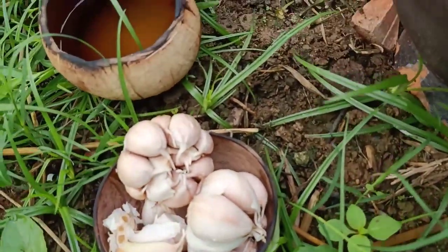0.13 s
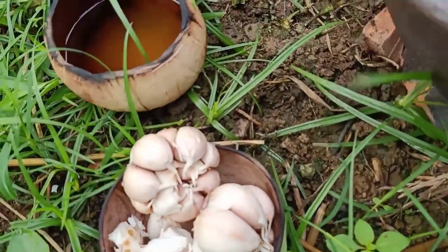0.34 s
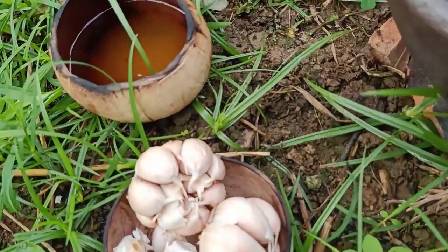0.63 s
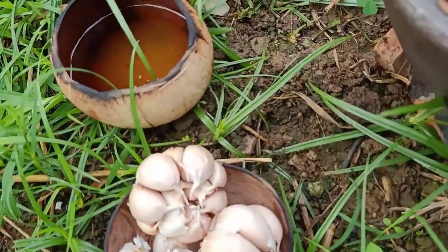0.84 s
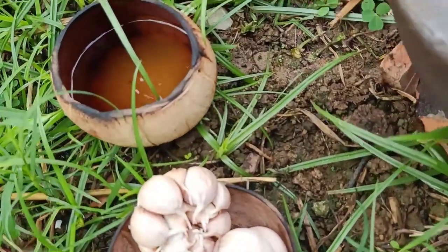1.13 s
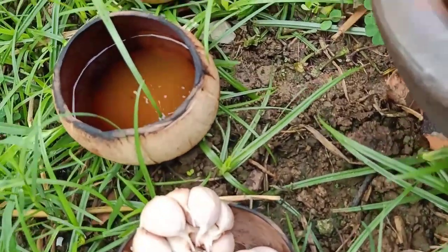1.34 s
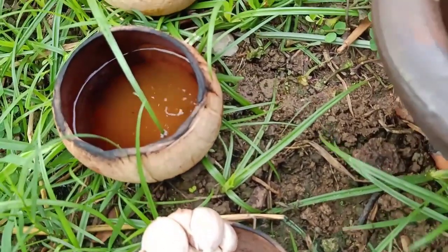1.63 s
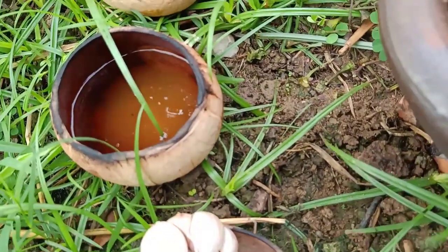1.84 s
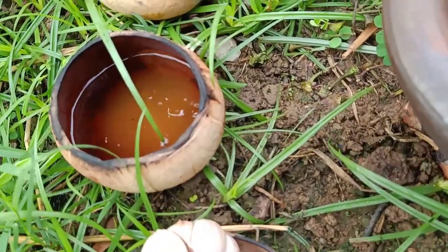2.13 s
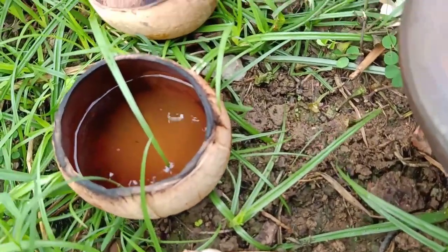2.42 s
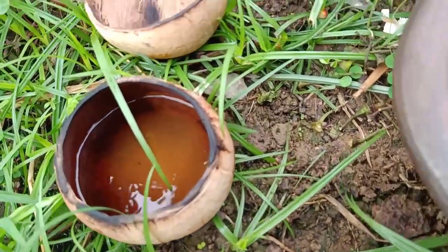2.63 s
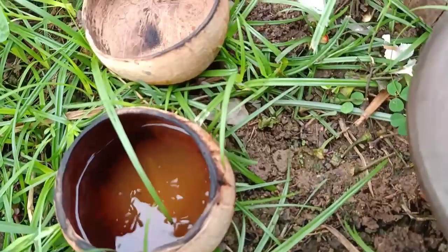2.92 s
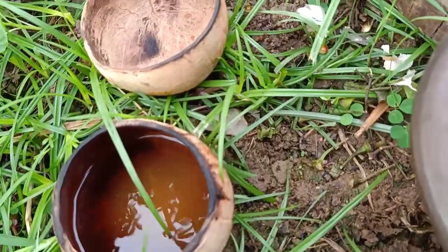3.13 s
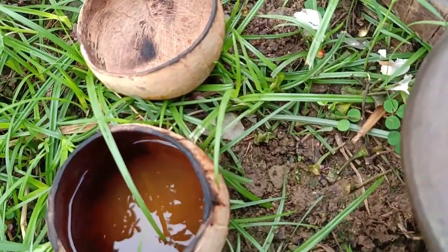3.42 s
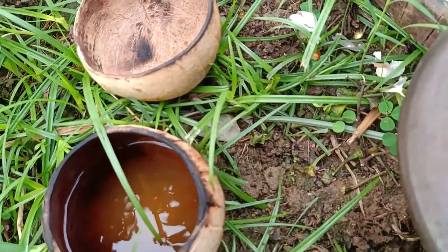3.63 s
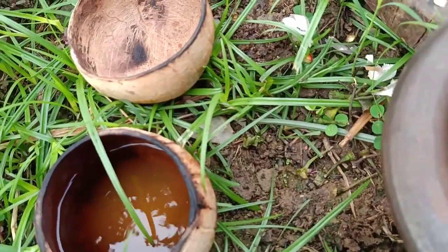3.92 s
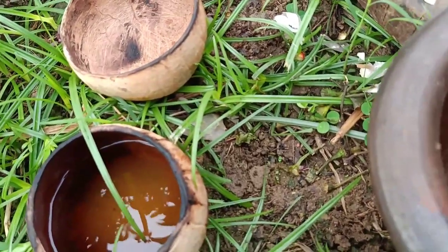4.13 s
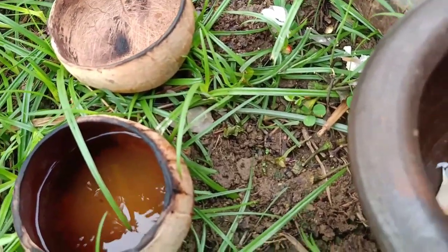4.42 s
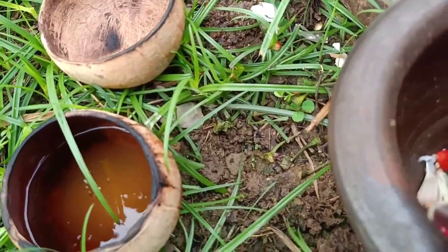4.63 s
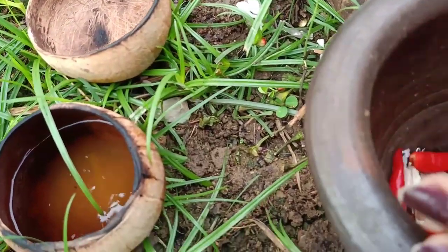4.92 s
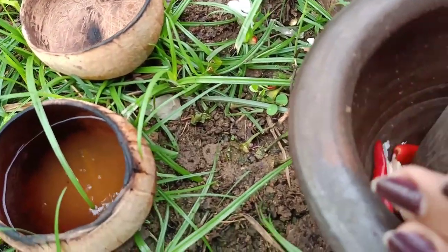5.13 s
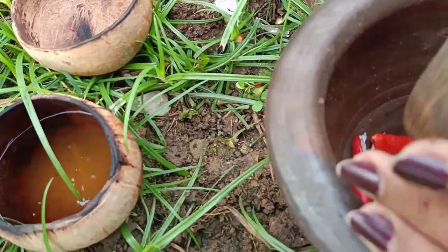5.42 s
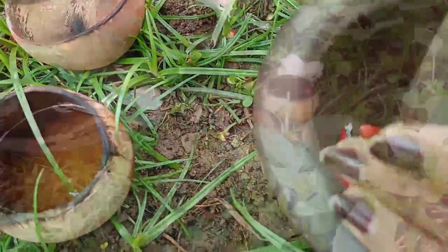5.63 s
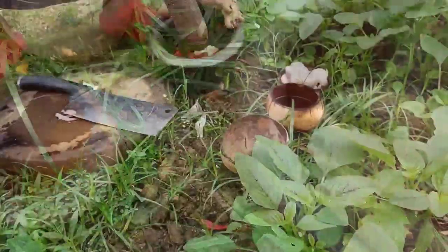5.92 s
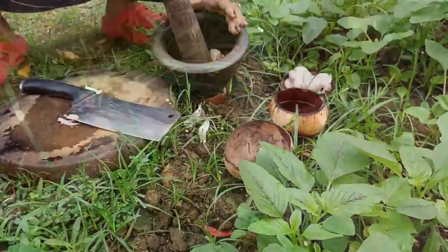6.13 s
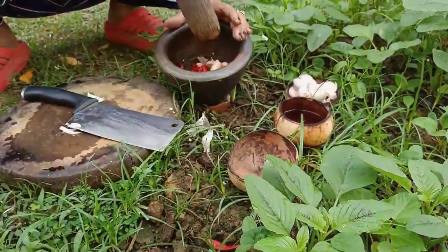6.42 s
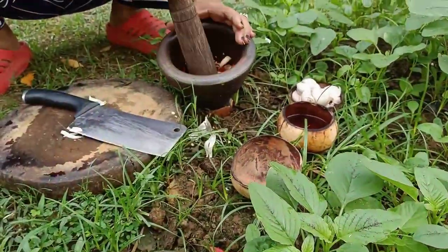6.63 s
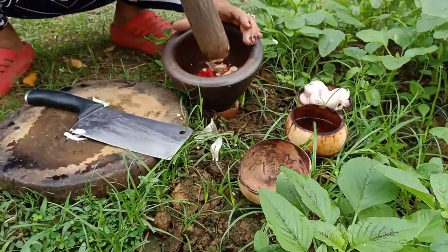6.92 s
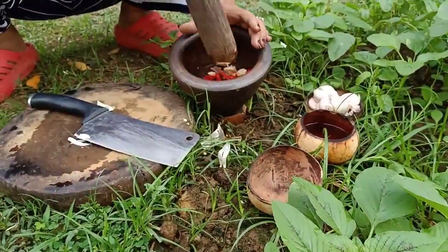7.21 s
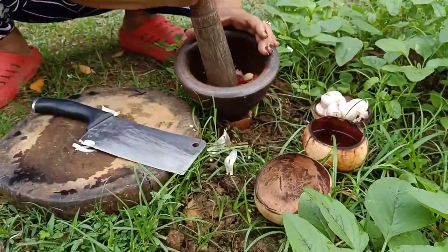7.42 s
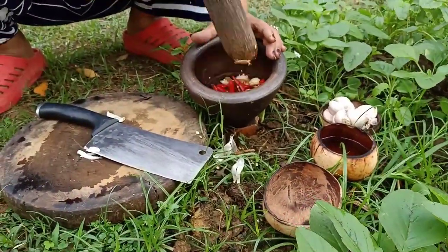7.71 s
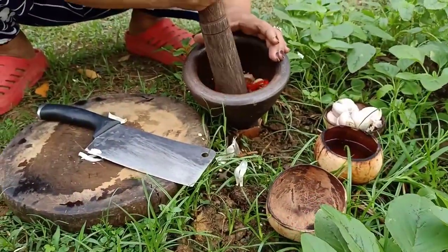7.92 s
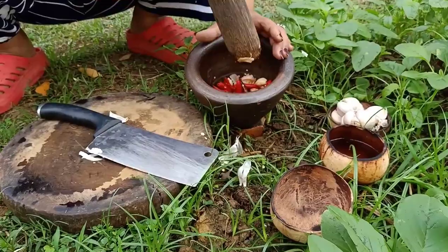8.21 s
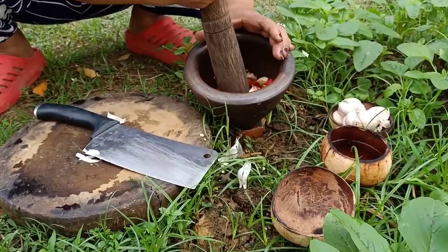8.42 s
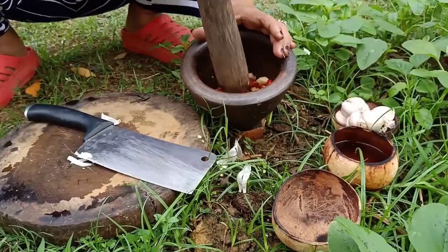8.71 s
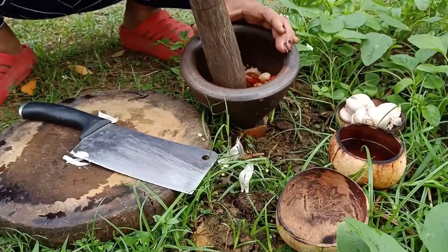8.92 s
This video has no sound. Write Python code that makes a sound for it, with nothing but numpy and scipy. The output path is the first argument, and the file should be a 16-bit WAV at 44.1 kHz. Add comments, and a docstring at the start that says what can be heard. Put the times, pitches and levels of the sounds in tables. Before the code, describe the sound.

A wooden pestle pounds chilies and garlic in a clay mortar with steady, crunchy knocks while small birds chirp faintly.

```python
"""Over garden rustle, faint insects and a far rumble, a wooden pestle pounds chilies and garlic in a clay
mortar on soil, about every 0.4 s. Each stroke crushes the pulp in two grainy bursts, sounds the bowl's
hollow, thuds into the ground and rings the clay; the pulp squelches around and between strokes. Small
birds chirp from 0.2 s on. The strokes are hardest from 2 to 5.5 s, then lighter, with a few quick taps
between 6 and 7 s. One near, buzzy bird call comes at 7.8 s."""
import sys
import numpy as np
from scipy import signal
from scipy.fft import rfft, irfft, next_fast_len
from scipy.io import wavfile
from scipy.ndimage import uniform_filter1d, map_coordinates

SR = 44100
rng = np.random.default_rng(int(sys.argv[2]) if len(sys.argv) > 2 else 0)


def to_wav(s):
    """Save 16-bit WAV."""
    ch = np.atleast_2d(s).T  # columns
    pcm = np.round(np.clip(ch, -1, 1) * 32767)  # PCM
    wavfile.write(sys.argv[1], SR, pcm.astype(np.int16))


N = 399546
PRE = SR // 20  # samples ahead of a burst's peak

# pestle strokes, bursts 1 and 2, levels relative: (bottom time [s], lead 1, 2 [ms], attack 1 [ms],
# release 2 [ms], crunch 1, 2 [dB], brightness 1, 2 [dB], hollow 1, 2 [dB], hollow pitch [Hz],
# wall pitch 1, 2 [0-1], snap pitch 1, 2 [0-1], hollow fall [ms], thud [dB], ring [dB], foot [dB],
# thud pitch [Hz])
STROKES = [(0.017, 18.3, 3.5, 1.2, 5.9, -26, -32, -7.0, 3, -34, -45, 680.4, 0.91, 0.54, 0.59, 0.45, 4.2, -60, -48, -75.0, 135),
           (0.368, 18.3, 8.5, 1.5, 7.6, -37, -26.5, -6, -1, -36, -38, 711, 0.68, 1, 0.3, 0.17, 7.5, -59, -68, -47, 135),
           (0.7244, 2.82, -12.5, 4.7, 2.4, -22.5, -42, -1.5, -1, -28, -47, 706, 0.97, 0.5, 0.25, 0.3, 5.3, -53, -49, -33.5, 133),
           (1.4399, 3.6, -6, 1.3, 5.3, -15, -26, -6, -1, -32, -34.5, 796, 0.91, 0.6, 0.13, 0.3, 4.4, -50, -47, -44, 138),
           (1.8392, 12, 3, 1.8, 7.3, -14, -18.5, -7, -3, -21.5, -36.5, 716.5, 1, 1, 0.31, 0.34, 4.3, -41.5, -65, -34.5, 154),
           (2.248, 18.1, 12, 1.6, 6.4, -18, -10.5, 1, -1, -25, -23, 688, 0.68, 0.87, 0.58, 1, 3.3, -48, -61, -45, 161),
           (2.6315, 9.8, 7.0, 5.5, 4.5, -16.5, -12.5, -8.5, 7, -40, -43, 702.3, 0.27, 0.64, 0.61, 1, 8, -52.5, -68.0, -52, 133),
           (3.0369, 6.7, -3, 5.8, 4.6, -15.5, -33.5, 1, -11, -30.5, -41.5, 707, 0.67, 0.6, 0.38, 0.2, 1.9, -40.5, -61.0, -57, 129),
           (3.4407, 15.6, 7, 2, 4.2, -22, -9.5, -11, -0.5, -33, -33.5, 699, 0, 0.26, 0.3, 0.46, 4.2, -37, -45, -57, 128),
           (3.8603, 12.6, 5, 3.1, 4.1, -10, -17.5, -5.5, -1, -28, -43, 741, 0, 0.52, 0.65, 0.38, 6, -40, -58.0, -57.5, 145),
           (4.2689, 10.8, 5, 4.2, 2.5, -15, -11, 5, -5.5, -23.5, -29.5, 722.5, 0.67, 0.78, 0.58, 0.7, 3.2, -36, -64.0, -33, 141),
           (4.684, 14, 3, 5.8, 0.94, -21.5, -10.5, -0.5, -5, -31.5, -26, 742, 0.5, 0.34, 0.47, 0.2, 1.5, -44, -59, -65, 127),
           (5.094, 12.3, 4.5, 2.5, 2.1, -24, -10, -15, -7, -31, -33, 753, 0.65, 0.51, 0.3, 0.098, 4.6, -32, -38, -26, 149),
           (5.517, 9.6, 7, 2.9, 4.3, -15.5, -14, -22, -2, -33, -23.5, 684.5, 0, 0.37, 0.3, 0.12, 2.9, -37.5, -48, -24.5, 133),
           (5.9264, 9.8, 5, 1.3, 3.2, -24, -15.5, -13, -0.5, -44.5, -25.5, 730, 0, 0.21, 0.15, 0.88, 4.2, -42.5, -65.5, -48, 138),
           (6.1673, 17, 5, 2.6, 6.2, -45.5, -31.5, -6, -2, -52, -41, 697, 0.3, 0.21, 0.039, 0.33, 3.6, -53.5, -55, -39, 137),
           (6.294, 0.1, 1.05, 0.99, 0.78, -40, -54, -6, -10, -56, -24, 838, 0.16, 0.1, 0.4, 0.4, 0.52, -61, -45, -69.0, 134),
           (6.5955, 13.5, 5, 3.3, 4.4, -32, -23, -11, -8.5, -42, -34, 700.0, 0.083, 0.24, 0.3, 0.085, 2.9, -49.5, -63, -38, 155),
           (6.73, 6.0, 0.5, 6.7, 9.1, -38.5, -39.0, -6, -4.5, -45.5, -61, 733, 0.9, 0.6, 0.4, 0.3, 3.1, -59, -63, -72, 135),
           (7.041, 6.7, 1.5, 10.2, 5.2, -31, -24.5, -11, -4, -37, -34, 754, 0.5, 0.77, 0.4, 0.17, 1.6, -51, -56, -64, 132),
           (7.4888, 20.5, 13.5, 6.4, 8.1, -31, -26, -11, -9, -47.5, -39, 708, 0.081, 0.1, 0.4, 0.2, 6, -55.5, -72, -65, 134),
           (7.922, 14.4, 10.5, 4.1, 7, -26, -25, -17, -4, -47, -37.5, 744, 0.89, 0.79, 0.3, 0.31, 6.7, -51.5, -55, -52, 136),
           (8.3698, 17.1, 6.5, 2.7, 8.5, -30, -28, -12, -4, -34, -38.5, 708, 0.26, 0.41, 0.3, 0.26, 4.8, -45.5, -57, -52, 160),
           (8.8067, 13.6, 3.5, 2.3, 6, -24.5, -23, -9.5, -11, -32.5, -50, 712, 0.11, 0.12, 0.53, 0.32, 5.2, -56, -57, -51, 135)]
# thick foot of the bowl: (centre [Hz], width [Hz], gain [dB])
FOOT_MODES = [(376, 320, 3.5), (1071, 182, -10)]
# sizzle of the finest spray: (centre [Hz], width [Hz], gain [dB])
SIZZLE_MODES = [(8850, 11000, -3.5), (11450, 280, 6), (14500, 4300, -1)]


def amp(db):
    """Level to gain."""
    return 10 ** (np.asarray(db) / 20)


def unit(x):
    """x at rms 1."""
    return x / np.sqrt(np.mean(x ** 2) + 1e-20)


def wobble(rate_hz):
    """Smooth random curve, knots at rate_hz."""
    knots = rng.standard_normal(int(N * rate_hz / SR) + 4)
    return map_coordinates(knots, [np.arange(N) * rate_hz / SR])


def curves(rows):
    """Per-sample curve of each column after the time."""
    s, *cols = np.transpose(rows)
    return [np.interp(np.arange(N) / SR, s, c) for c in cols]


def filtered(x, response):
    """x through a complex frequency response."""
    m = next_fast_len(N + SR // 2)
    return irfft(rfft(x, m) * response(np.fft.rfftfreq(m, 1 / SR)), m)[:N]


def resonant(x, modes):
    """x through parallel resonances; white noise keeps its level."""
    def response(f):
        h = sum((-1) ** k * amp(db) * 1j * f * width / (hz * hz - f * f + 1j * f * width)
                for k, (hz, width, db) in enumerate(modes))
        return h / np.sqrt(np.mean(np.abs(h) ** 2))
    return filtered(x, response)


def resonant_twice(x, modes):
    """Two passes for steeper skirts."""
    return resonant(resonant(x, modes), modes)


def coloured(spectrum):
    """Noise of the given spectral shape, rms 1."""
    hz, db = np.transpose(spectrum)
    noise = rng.standard_normal(N)
    return unit(filtered(noise, lambda f: amp(np.interp(np.log(f + 1), np.log(hz), db))))


def patchy(depth_db):
    """Noise with patches that swell and fade in separate bands, rms 1."""
    z = signal.stft(rng.standard_normal(N), nperseg=512)[2]
    field = uniform_filter1d(rng.standard_normal(z.shape), size=5, axis=0)
    field = uniform_filter1d(field, size=12, axis=1)
    return unit(signal.istft(z * amp(depth_db * unit(field)), nperseg=512)[1][:N])


def swell(db, rise_ms, fall_ms):
    """Burst envelope peaking at sample PRE; rise and fall to -10 dB."""
    ms = np.arange(-PRE, SR // 10) / SR * 1000
    return amp(db - 10 * np.where(ms < 0, np.abs(ms / rise_ms) ** 2.02, np.abs(ms / fall_ms) ** 0.93))


def echoes(x, t60_s, gap_s):
    """Scattered returns from plants and walls."""
    t = np.arange(int(t60_s * SR)) / SR
    tail = rng.standard_normal(len(t)) * amp(-60 * t / t60_s) * (t > gap_s)
    return signal.fftconvolve(x, tail / np.linalg.norm(tail))[:N]


def rustle():
    """Pulp and leaves: a dull band and a flickering bright one."""
    # rustle over time: (time [s], dull [dB], bright [dB])
    levels = [(0, -74, -67.5), (.55, -65, -70), (1.4, -66, -72), (2, -68.5, -71.5), (2.75, -65.5, -69),
              (3.2, -69.5, -75), (4, -65.5, -72), (4.6, -69.5, -84), (5.1, -67.5, -83), (5.57, -67.5, -74),
              (5.8, -71.5, -81), (6.5, -68.5, -77.5), (7.1, -62.5, -70.5), (7.55, -62.5, -70),
              (7.95, -66, -73), (8.3, -68, -72.5), (9.06, -63.5, -68)]
    # rustle resonances: (centre [Hz], width [Hz], gain [dB])
    dull_modes = [(1700, 650, 9), (2440, 1200, 11)]
    bright_modes = [(5020, 2400, 7.5), (5830, 810, 14)]
    dull_db, bright_db = curves(levels)
    coarse, fine = patchy(depth_db=3.2), patchy(depth_db=3)
    flicker_db = 2 * wobble(30) + 2 * wobble(200)
    dull = unit(resonant_twice(coarse, dull_modes))
    bright = unit(resonant_twice(fine, bright_modes) + amp(-3.5) * resonant(fine, SIZZLE_MODES))
    return amp(dull_db) * dull + amp(bright_db + flicker_db) * bright


def insects():
    """Faint shrill in two narrow noise bands."""
    # shrill over time: (time [s], level [dB])
    levels = [(0, -85), (3.8, -92), (4.6, -79.5), (5.3, -91), (6.5, -92), (7, -83), (7.6, -92),
              (8.3, -87.5), (9.06, -86)]
    # shrill bands: (centre [Hz], width [Hz], gain [dB])
    bands = [(8000, 500, 0), (13600, 900, -4)]
    return amp(curves(levels)[0]) * unit(resonant_twice(rng.standard_normal(N), bands))


def distance():
    """Throbbing far rumble and broad air noise."""
    # background over time: (time [s], rumble [dB], air [dB])
    levels = [(0.0, -51.5, -60.5), (1.16, -51.5, -62), (1.69, -53.5, -63), (2.04, -51, -61.5),
              (2.52, -53.5, -60), (3.46, -52, -61.5), (4.54, -53.5, -62), (4.99, -51.5, -62.5),
              (5.55, -53.5, -61.5), (5.73, -54.5, -63), (6.11, -60, -67), (6.46, -59.5, -65.5),
              (7.27, -54, -60.5), (8.45, -55.5, -62.5), (8.81, -54.5, -62), (9.06, -55.5, -61.5)]
    # noise spectra: (frequency [Hz], relative density [dB])
    rumble_spectrum = [(15, -51), (25, -27), (37, -23.5), (56, -8.5), (97, 3.5), (134, -7.5), (162, -8.5),
                       (458, -27), (500, -23.5), (650, -45.5), (1100, -120)]
    air_spectrum = [(150, -37), (250, -4.5), (330, -5), (618, -3), (788, -8.5), (922, -11), (1280, -13),
                    (1730, -8.5), (4190, -19.5), (6040, -21.5), (8700, -34), (13700, -34), (16000, -43.5)]
    rumble_db, air_db = curves(levels)
    rumble = amp(rumble_db + .7 * wobble(7)) * coloured(rumble_spectrum)
    return rumble + amp(air_db + 1.1 * wobble(6)) * coloured(air_spectrum)


def bursts():
    """Two crushes a stroke: (time [s], rise [ms], fall [ms], crunch [dB], brightness [dB],
    wall pitch [0-1], snap pitch [0-1], hollow [dB], hollow pitch [Hz], hollow fall [ms])."""
    fall1_ms, max_rise2_ms = 5.37, 3.46
    rows = []
    for s, lead1_ms, lead2_ms, rise1_ms, fall2_ms, db1, db2, bright1, bright2, *rest in STROKES:
        hollow1, hollow2, hz, wall1, wall2, snap1, snap2, hollow_ms, *_ = rest
        s1, s2 = s - lead1_ms / 1000, s - lead2_ms / 1000
        rise2_ms = min(max_rise2_ms, rise1_ms + max(lead1_ms - lead2_ms, 0))  # never ahead of burst 1
        rows += [(s1, rise1_ms, fall1_ms, db1, bright1, wall1, snap1, hollow1, hz, hollow_ms),
                 (s2, rise2_ms, fall2_ms, db2, bright2, wall2, snap2, hollow2, hz, hollow_ms)]
    return rows


def soft_bursts():
    """Skins giving before a stroke, pulp slumping after it, and scattered squelches:
    (time [s], rise [ms], fall [ms], level [dB], brightness [dB], graininess [0-1])."""
    # squelches and ticks just before, after and between strokes:
    # (time [s], level [dB], length [ms], brightness [dB])
    squelches = [(.3771, -44, 6.1, 13), (.3919, -47, 35, -3), (0.439, -43, 6.3, 1), (0.5404, -46, 2.8, 19),
                 (0.558, -48.5, 11.5, 16), (.47, -50.5, 52, -25), (.63, -59, 34, -21),
                 (0.755, -42, 11.5, 1), (1.4318, -36, 2.5, -9), (1.455, -41, 22, -6), (1.56, -44.5, 2.2, 0),
                 (1.575, -51.5, 10, 1), (1.602, -55, 20, 3), (1.885, -42, 2.1, -4), (1.913, -40, 5.2, -3),
                 (1.942, -46.5, 13, -12), (2.059, -46, 12, -2), (2.28, -30.5, 2.3, -3.5),
                 (2.35, -44.5, 8.8, -4), (2.3622, -42.5, 4.3, -1), (2.377, -48, 15, -5),
                 (2.666, -49, 28, 6), (2.694, -47, 3, 4), (2.709, -44, 5.9, -1), (2.719, -38, 1.6, 6),
                 (2.729, -35.5, 2.7, 0), (2.738, -32.5, 1.4, 4), (2.746, -44, 7.6, -4),
                 (2.76, -48, 50, -1.5), (2.816, -45, 4.4, -4), (2.832, -51, 7.3, 10),
                 (3.057, -34.5, 7.4, -6), (3.0695, -43.5, 12, -3), (3.127, -37, 1.5, -16),
                 (3.12, -49, 4.1, 8), (3.1325, -29.5, 2, -7), (3.142, -42, 8.1, -4), (3.151, -47, 60, 1),
                 (3.2, -54, 30, 0), (3.232, -48, 21.3, 6), (3.254, -49.5, 8.9, 10),
                 (3.4594, -24.5, 8.5, -1.5), (3.546, -43.5, 15, 0), (3.557, -33.5, 3.4, 6.5),
                 (3.564, -37.5, 1.8, 0), (3.578, -50.5, 23, 3), (3.8797, -22.5, 4.3, 3.5),
                 (3.951, -39.5, 3, -4), (3.9605, -34, 2.6, 0), (3.969, -29.5, 4.6, -9.5),
                 (3.9954, -46.5, 18, 0), (4.063, -52.5, 5.5, 5.5), (4.286, -26, 3.4, 10),
                 (4.2951, -22, 3.7, 15), (4.366, -46, 11, -7), (4.3734, -36.5, 2.8, -0.5),
                 (4.388, -45.5, 15, 3.5), (4.425, -61.5, 25, 1), (4.467, -55, 2.1, 7.5),
                 (4.538, -48, 2.1, 11.5), (4.66, -25, 3, -13), (4.701, -35, 1.8, -19), (4.745, -46, 3, 9.5),
                 (4.7525, -45.5, 7, 6), (4.783, -49, 2, 3), (4.795, -48.5, 35, -5.5), (4.805, -43, 1.8, 2),
                 (4.819, -47, 1.5, -1), (4.831, -51, 2, 2), (4.882, -51, 2, 4), (5.0973, -22.5, 3.7, 4),
                 (5.103, -27, 2, 8), (5.111, -34.5, 5.3, -4), (5.164, -50, 18, 3), (5.209, -49.5, 25, -8),
                 (5.5432, -48.5, 24, 8), (5.63, -51, 47, -8), (5.73, -44.5, 7.6, 0.5), (5.91, -44, 2.5, 6),
                 (6.314, -50, 2.7, 2), (6.321, -39, 7, 1), (6.333, -41.5, 17, -1), (6.345, -36, 5, -5),
                 (6.383, -50.5, 3.8, 3), (6.435, -58, 13, 12), (6.459, -59, 8.1, 12), (6.483, -60, 3.3, 16),
                 (7.262, -49, 3.9, -18), (7.573, -49, 4, 0), (7.606, -45, 3.7, -10), (7.787, -42, 2.2, 13),
                 (8.03, -58, 41, -4), (8.22, -64, 40, -14.5), (8.108, -49.5, 1.9, 17),
                 (8.496, -43, 3, -9.5)]
    rows = []
    for s, lead_ms, _, attack_ms, _, db1, db2, bright_db, *_ in STROKES:
        touch = (s - (lead_ms + attack_ms + 0.5) / 1000, 1.5, 1.5, db1 - 30, bright_db, 0)
        slump = (s + 0.015, 11, 28, max(db1, db2) - 35, -3.5, 1)
        rows += [touch, slump]
    for s, db, ms, bright_db in squelches:
        rows.append((s, 0.62 * ms, ms, db, bright_db, min(ms / 12, 1)))  # slow ones break into grains
    return rows


def crush_power():
    """Power of all bursts in five bands: low and high wall, low and high snap, spray."""
    # the crunch's finest sizzle over time: (time [s], level re burst [dB])
    spray_levels = [(0, -15), (.6, -17), (1.8, -12.5), (2.7, -15), (3.4, -22), (3.9, -22), (4.1, -26),
                    (4.26, -21), (4.3, -30), (4.7, -27), (5.6, -36), (5.92, -13.5), (6.2, -45), (6.29, -29),
                    (6.33, -19), (6.5, -18), (7, -24), (9, -18)]
    power = np.zeros((5, N + SR))
    grains_db = np.array([np.pad(3 * wobble(400), (PRE, SR)) for _ in power])
    pitch_wander = np.clip(.5 + .35 * np.array([wobble(30), wobble(30)]), 0, 1)
    rows = [(*row, *pitch_wander[:, max(round(row[0] * SR), 0)]) for row in soft_bursts()]
    rows += [(*row[:5], 0, *np.clip(row[5:7], 0, 1)) for row in bursts()]
    for s, rise_ms, fall_ms, db, bright_db, grainy, wall_up, snap_up in rows:
        at = max(round(s * SR), 0)
        snap = 1 / (1 + amp(-2 * bright_db))
        spray_db = np.interp(s, *np.transpose(spray_levels)) + 0.56 * bright_db
        shares = [(1 - snap) * (1 - wall_up), (1 - snap) * wall_up,
                  snap * (1 - snap_up), snap * snap_up, amp(2 * spray_db)]
        gain = swell(db, rise_ms, fall_ms)
        gain = gain * amp(grainy * grains_db[:, at:][:, :len(gain)])
        power[:, at:][:, :gain.shape[1]] += np.array(shares)[:, None] * gain ** 2
    return power[:, PRE:][:, :N]


def pops(rate_hz):
    """Single cells pop at loosely even spacing, rms 1."""
    count = int(N * rate_hz / SR) - 1
    at = ((np.arange(count) + rng.random(count)) * SR / rate_hz).astype(int)
    heights = rng.choice([-1, 1], count) * amp(rng.normal(0, 3, count))
    return unit(np.bincount(at, heights, N))


def grit():
    """Bursting cells: lumpy hiss and pops in the five crush bands."""
    envelope = np.sqrt(crush_power())
    lumps = unit(amp(3.5 * np.array([wobble(900), wobble(1100)])))
    hiss = lumps[[0, 0, 1, 1, 1]] * rng.standard_normal((5, N))
    pop_share = .55 * np.array([[1], [1], [1], [1], [0]])  # spray is hiss alone
    return envelope * (np.sqrt(1 - pop_share) * hiss + np.sqrt(pop_share) * pops(rate_hz=1300))


def crunch():
    """Crushed pulp excites the bowl; skins snap and fine spray sizzles."""
    # bowl walls, snapping skins, air in the bowl: (centre [Hz], width [Hz], gain [dB])
    wall_modes = [(1520, 209, 9.5), (2413, 428, 15.5), (3900, 1800, -5.5)]
    snap_modes = [(5050, 1860, 6.35), (6040, 835, 13.83)]
    air_modes = [(709.5, 70, 0)]
    # spray above spray_edge_hz: (time [s], gain [dB])
    top_levels = [(0, -3), (2, 0), (3.5, -2), (4.3, 3), (5.1, 8), (5.6, -5), (6.2, -3), (7, 0), (9.06, -1)]
    spray_edge_hz, damp_hz = 12500, 8450  # the crunch's treble rolls off above damp_hz

    def retuned(modes, strongest_hz):
        return [modes[0], (strongest_hz, *modes[1][1:]), *modes[2:]]

    bands = grit()
    walls = sum(resonant(x, retuned(wall_modes, hz)) for x, hz in zip(bands[:2], (2360, 2695)))
    skins = sum(resonant(x, retuned(snap_modes, hz)) for x, hz in zip(bands[2:4], (5807, 6096)))
    coarse = bands[0] + bands[1]
    body = amp(-5) * walls + amp(-22) * resonant(coarse, FOOT_MODES)
    body += amp(-14) * resonant(coarse, air_modes)
    damped = filtered(body + amp(-4) * skins, lambda f: 1 / (1 + 1.2j * f / damp_hz - (f / damp_hz) ** 2))
    spray = resonant(bands[4], SIZZLE_MODES)
    top = filtered(spray, lambda f: np.clip((f - spray_edge_hz) / 1500 + .5, 0, 1))
    return damped + amp(-2) * (spray + (amp(curves(top_levels)[0]) - 1) * top)


def hollow():
    """The pestle pumps the bowl's air: a short, unsteady tone with a rough woody edge."""
    # pestle head: (centre [Hz], width [Hz], gain [dB])
    wood_modes = [(1102, 785, 0)]
    lags_ms = (-1.5, 1.255) * len(STROKES)  # re bursts 1 and 2
    tone, push = np.zeros((2, N + SR))
    rows = bursts()
    start_turns = rng.random(len(rows))
    waver_turns = np.pad(.09 * wobble(250), (PRE, SR))  # pulp keeps changing the air volume
    for (s, rise_ms, *_, db, hz, fall_ms), start_turn, lag_ms in zip(rows, start_turns, lags_ms):
        at = max(round((s + lag_ms / 1000) * SR), 0)
        gain = swell(db + 6.5, rise_ms, fall_ms)
        n = len(gain)
        turns = hz * np.arange(n) / SR + start_turn + waver_turns[at:at + n]
        tone[at:at + n] += gain * np.sin(2 * np.pi * turns)
        push[at:at + n] += gain
    wood = resonant_twice(push[PRE:][:N] * rng.standard_normal(N), wood_modes)
    return tone[PRE:][:N] * amp(2.3 * wobble(400)) + amp(-23) * wood


def blows():
    """The pestle bottoms: the bowl swings on soft soil, its foot knocks, the clay rings faintly."""
    # ring of the clay: (frequency [Hz], level [dB], t60 [s])
    clay_modes = [(1705, -4, 0.085), (2870, -22, 0.06)]
    lead_s = 0.0073  # swing start to deepest point
    out, jolts = np.zeros(N + SR), np.zeros(N)
    t = np.arange(SR // 5) / SR
    shiver = amp(4 * wobble(160))  # pulp damps the clay unevenly
    soil_give = 0.39 * np.sin(2 * np.pi * 62 * t) * (t / 0.0062) * np.exp(1 - t / 0.0047)
    ring = sum(amp(db - 60 * t / t60_s) * np.sin(2 * np.pi * hz * t) for hz, db, t60_s in clay_modes)
    ring *= 1 - np.exp(-t / 0.0016)
    for s, *_, thud_db, ring_db, foot_db, thud_hz in STROKES:
        swing = -np.cos(2 * np.pi * thud_hz * (t - lead_s))
        swing *= (t / 0.0042) ** 2.1 * np.exp(1.6 - t / 0.0026)
        uneven_ring = ring * shiver[round(s * SR):][:len(t)]
        out[round((s - lead_s) * SR):][:len(t)] += amp(thud_db + 14.5) * (swing - soil_give)
        out[round((s - .001) * SR):][:len(t)] += amp(ring_db + 11.5) * uneven_ring
        jolts[round((s - .003) * SR)] = amp(foot_db + 23.5)
    return out[:N] + resonant(jolts, FOOT_MODES)


def birds():
    """Slightly rough whistles with echoes; high calls come from deeper among the plants."""
    # thin high calls: (time [s], top pitch [Hz], level [dB], length [s])
    seeps = [(0.163, 7260, -48, 0.04), (1.106, 7470, -55, 0.065), (1.29, 7500, -64.5, 0.075),
             (7.164, 6930, -55.5, 0.065)]
    # contour of one: (position [0-1], share of top pitch [0-1], gain [dB])
    seep_shape = [(0, 0.49, -4), (.1, 1, -2), (.5, 0.97, 0), (.85, .87, 3), (1, 0.8, 3)]
    # gliding whistles: (time [s], length [s], from [Hz], to [Hz], from [dB], to [dB])
    whistles = [(0.45, 0.033, 2930, 2805, -45, -46), (0.499, .1, 1715, 1660, -59, -79),
                (0.607, 0.028, 2710, 2220, -53, -52), (.654, 0.013, 2980, 2740, -38, -52),
                (1.02, 0.063, 4020, 3900, -55, -62), (1.35, 0.033, 2140, 2070, -63, -51),
                (4.511, 0.057, 2485, 2380, -55, -64), (8.2, .03, 1710, 1620, -61, -59),
                (1.219, .037, 5830, 5500, -55, -57), (2.49, .03, 4200, 3900, -55, -62),
                (2.759, 0.054, 3500, 3430, -56, -82), (2.853, 0.095, 1520, 1420, -55, -62),
                (2.938, 0.083, 3640, 3390, -71, -51.5), (3.047, .07, 3270, 3250, -62, -66),
                (3.4, .02, 4930, 4700, -65, -63.5), (3.259, 0.18, 2750, 2530, -61, -64),
                (3.362, 0.013, 4870, 4630, -62.5, -64), (6.651, 0.064, 4300, 3600, -64, -63),
                (7.068, 0.039, 4200, 2800, -55, -59), (7.097, 0.06, 1900, 1750, -54, -56),
                (7.6, .09, 1860, 1820, -58, -67)]
    # one near, buzzy call: (time [s], pitch [Hz], level [dB])
    buzz = [(7.786, 5350, -63), (7.791, 6160, -32), (7.794, 5660, -50), (7.798, 8150, -48),
            (7.806, 6340, -35), (7.811, 7430, -55), (7.817, 5700, -28.5), (7.821, 6700, -57),
            (7.827, 4500, -48), (7.832, 6300, -54)]
    high_calls = [[(s + u * length_s, top_hz * share, db + gain_db) for u, share, gain_db in seep_shape]
                  for s, top_hz, db, length_s in seeps]
    low_calls = [[(s, hz0, db0), (s + length_s, hz1, db1)]
                 for s, length_s, hz0, hz1, db0, db1 in whistles]
    low, high = np.zeros((2, N))
    shake = wobble(500)
    flutter = amp(3 * wobble(150) - 3)  # leaves in the way
    for track, calls, quaver_depth in (low, low_calls, .018), (high, [buzz] + high_calls, .012):
        quaver = 1 + quaver_depth * shake
        for call in calls:
            s, hz, db = np.transpose(call)
            t, at = np.arange(s[0], s[-1], 1 / SR), round(s[0] * SR)
            edge = np.clip(np.minimum(t - s[0], s[-1] - t) / 0.0021, 0, 1)
            phase = 2 * np.pi * np.cumsum(np.interp(t, s, hz) * quaver[at:][:len(t)]) / SR
            track[at:][:len(t)] += edge * amp(np.interp(t, s, db)) * np.sin(phase)
        track *= flutter
    low += amp(-7) * echoes(low, t60_s=0.13, gap_s=0.003)
    high += amp(-2) * echoes(high, t60_s=0.28, gap_s=0.003)
    return low + high


def scene():
    """Near, almost dry mortar in the garden; mono."""
    mortar = crunch() + hollow() + blows()
    mortar += amp(-24.5) * echoes(mortar, t60_s=0.18, gap_s=0.00017)
    return (mortar + birds() + rustle() + insects() + distance())[None]


def record(dry):
    """Microphone: bass roll-off, treble shelf, band limit, small DC offset."""
    bass_hz, shelf_hz, limit_hz, offset = 45, 15250, 16600, 0.0012

    def response(hz):
        top = (hz < limit_hz) * amp(-26 * np.clip((hz - shelf_hz) / 350, 0, 1))
        return top * hz ** 2 / (hz ** 2 + bass_hz ** 2)
    return (filtered(dry[0], response) + offset)[None]


dry = scene()
out = record(dry)
to_wav(out)
```